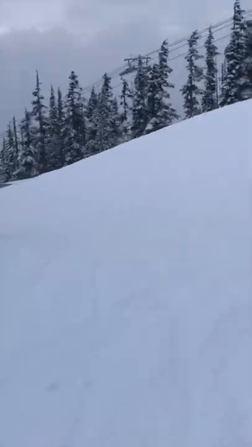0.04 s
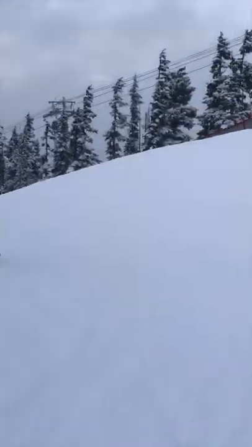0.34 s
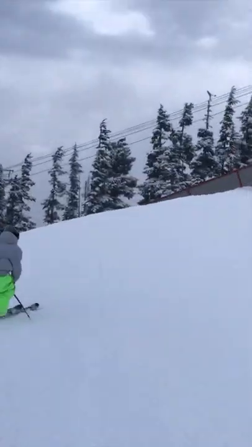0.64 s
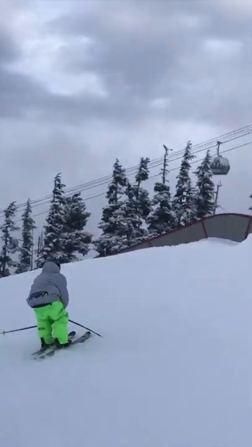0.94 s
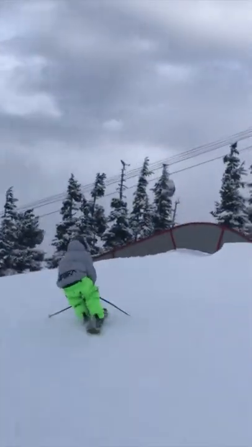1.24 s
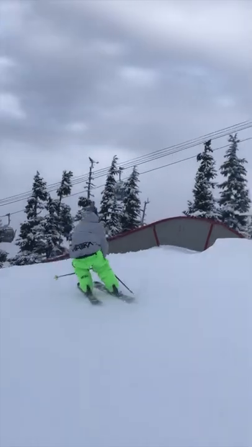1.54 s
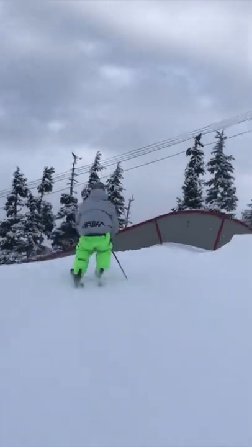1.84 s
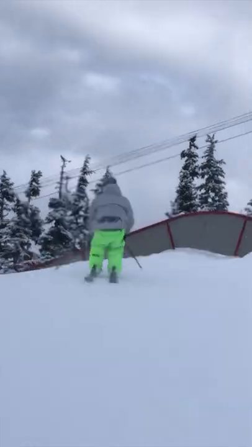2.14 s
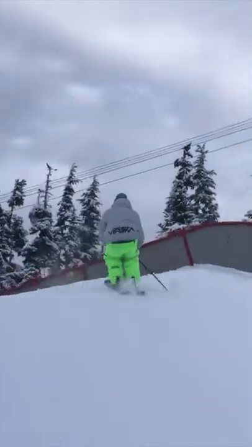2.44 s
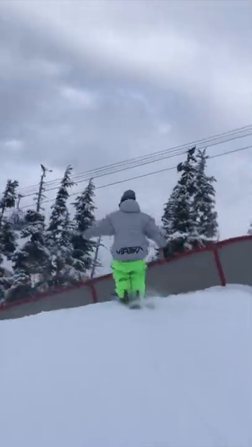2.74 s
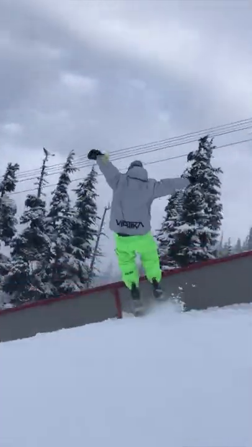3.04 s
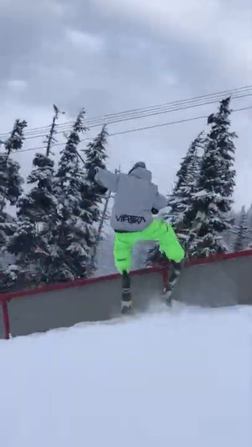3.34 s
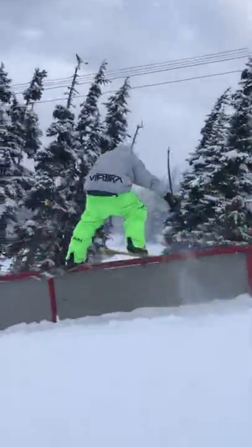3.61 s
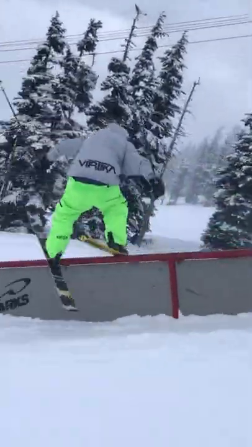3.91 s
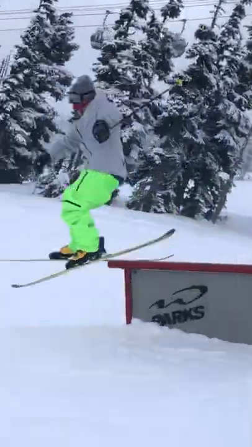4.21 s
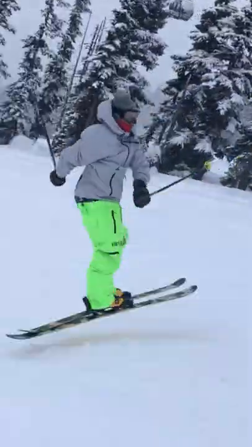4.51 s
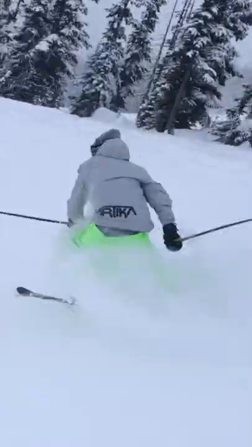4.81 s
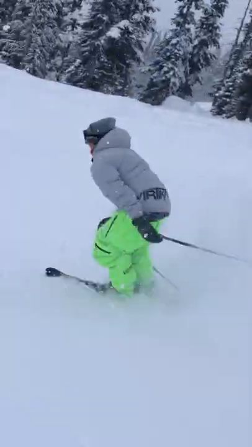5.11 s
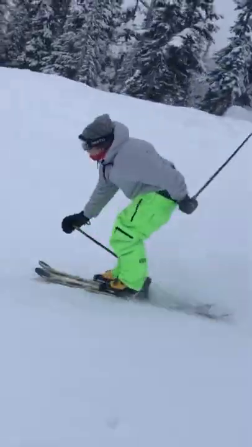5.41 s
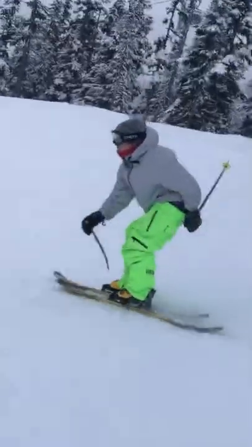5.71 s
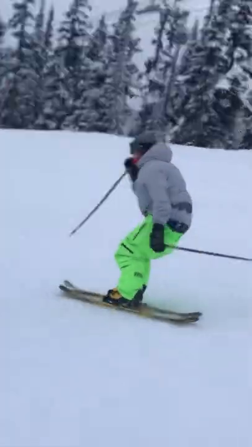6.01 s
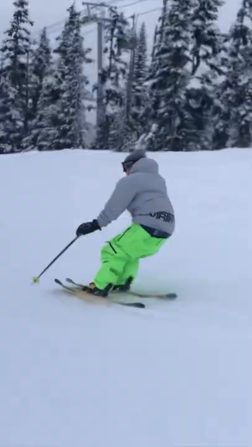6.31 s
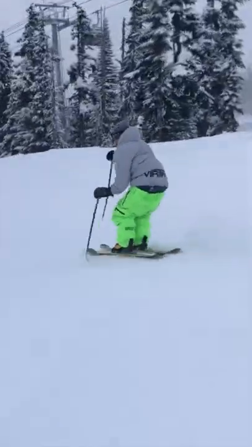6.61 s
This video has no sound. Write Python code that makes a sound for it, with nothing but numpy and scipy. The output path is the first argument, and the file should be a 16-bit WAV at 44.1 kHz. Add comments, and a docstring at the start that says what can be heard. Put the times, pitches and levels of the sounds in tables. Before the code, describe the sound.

A skier glides over packed snow, hits a steel-topped box with clacks and scrapes, lands and carves, ending in roaring wind.

```python
"""A skier glides over snow, followed by a camera; friction hisses, and lumps crumble and knock on the skis.
At 3.3 s the skis clack onto a steel-topped park box, and their edges scrape along it by stick and slip.
Near 4.6 s they slap down on the landing, ringing and flexing, then carve through a spray of snow.
From 5.9 s the camera gathers speed: a gust hits its microphone with a sharp tick, then roars."""
import sys
import numpy as np
from scipy.fft import rfft, irfft, next_fast_len
from scipy.io import wavfile
from scipy.ndimage import uniform_filter1d, minimum_filter1d, map_coordinates

SR = 44100
rng = np.random.default_rng(int(sys.argv[2]) if len(sys.argv) > 2 else 0)


def inscribe(sig):
    """Save sig as 16-bit PCM at rate SR to the path in sys.argv[1].

    A 1-D sig is mono; a 2-D sig holds one channel per row.
    Samples are clipped to [-1, 1] before scaling.
    """
    pcm = np.round(np.clip(np.atleast_2d(sig).T, -1, 1) * 32767)
    wavfile.write(sys.argv[1], SR, pcm.astype(np.int16))


N = 297675

# low rumble of flexing skis and of swirling air: f/Hz, spectral level/dB
RUMBLE_SPECTRUM = [(20, -24), (40, -4), (70, 3), (110, -1.5), (160, -1.5), (230, -9.5), (330, -17),
                   (550, -17), (1200, -46), (4000, -80)]
# hollow modes of a ski on snow: f/Hz, bandwidth/Hz, gain/dB
KNOCK_MODES = [(684, 250, -8.5), (1029, 98, 3), (1317, 140, -10), (2160, 210, -19.5)]
CRUNCH_DB = -52.5  # base level on plain packed snow


def clacks_and_wind_tick(noise_share=0.13, dispersion=0.029):
    """Impulse response: blows and rattling bindings ring the ski, treble travelling faster than bass.
    The last impulse is the sharp tick of wind hitting the microphone as the gust begins."""
    # ski clacks, then the wind tick at 5.96 s: t/s, peak level/dB, centre f/Hz, noise t60/s
    impulses = [(.168, -28, 9000, .012), (1.284, -18.5, 1400, .035), (1.465, -26.5, 2800, .033),
                (1.534, -27, 3400, .025), (1.593, -26, 4020, .025), (1.881, -27, 3200, .055),
                (2.142, -26.5, 2400, .035), (3.3071, -6, 2740, .024), (3.3103, -8.5, 2400, .018),
                (3.32, -10.5, 2500, .025), (3.455, -18.5, 2630, 0.0094), (3.592, -24, 3040, .04),
                (3.7964, -27.5, 1500, .049), (3.8384, -28.5, 3000, 0.059), (4.248, -28, 900, 0.12),
                (4.454, -22, 1800, .012), (4.556, -8.5, 4700, 0.0091), (4.559, -19.5, 1500, 0.054),
                (4.5856, -18, 1420, 0.019), (4.594, -11, 3600, 0.013), (4.596, -17, 1490, .025),
                (4.653, -20.5, 2800, 0.028), (5.962, -21, 2000, .025)]
    # modes of the steel-edged ski, also used to colour the tick: f/Hz, bandwidth/Hz, gain/dB
    modes = [(450, 400, -14.5), (1000, 380, -1), (1400, 390, -3), (1920, 330, 2.5), (2340, 160, 3.5),
             (2900, 850, -0.5), (3530, 390, -4), (4450, 1200, 2), (5430, 640, -3), (6600, 1000, -6),
             (8140, 3400, -6), (14300, 5000, -14)]
    out, t = np.zeros(N), np.arange(SR // 8) / SR
    colour = lambda f: modal_response(f, modes) * np.exp(-2j * np.pi * dispersion * np.sqrt(f))
    for s, db, hz, t60 in impulses:
        force = noise_share * rng.standard_normal(len(t)) * amp(-60 * t / t60)
        force[0] += 1  # the sharp onset
        add(out, s, filtered(force, lambda f: colour(f) * resonance(f, hz, 1.78 * hz) ** 2), db)
    return out


def scrapes(ring_db=-6, grit_db=1.6):
    """Stick-slip friction: an edge's tiny slips ring the steel box; its angle sets the brightness."""
    # edge drags: start t/s, hardest t/s, end t/s, level/dB, centre f/Hz
    drags = [(3.395, 3.432, 3.46, -31.5, 3300), (3.42, 3.476, 3.495, -30.5, 2900),
             (3.862, 3.905, 3.96, -37.5, 2930), (3.9, 3.995, 4.04, -31.7, 3100),
             (3.96, 4.004, 4.113, -33.5, 4800), (4.085, 4.125, 4.145, -40, 2600),
             (4.388, 4.44, 4.462, -42.5, 4270), (4.405, 4.452, 4.462, -37.5, 1680)]
    # box under a dragging edge: f/Hz, spectral level/dB
    spectrum = [(600, -30), (1300, 4), (1750, -2.5), (2300, 2), (3200, -3.5), (4200, -1), (5500, -0.5),
                (7000, -6), (9000, -3), (15000, -12)]
    # modes of the steel top: f/Hz, bandwidth/Hz, gain/dB
    box_modes = [(2240, 100, 1.5), (2990, 180, -2.5), (3344, 49, -1), (3600, 75, -4), (4000, 56, -3)]
    out = np.zeros(N)
    for start, hardest, end, db, hz in drags:
        slips = coloured(grains(rate=3000, spread_db=2, smooth=0.71), spectrum)
        steel = ringing(grains(rate=760, spread_db=5.5, smooth=0.34), box_modes)
        rasp = unit(filtered(slips + amp(ring_db) * steel, lambda f: resonance(f, hz, 0.9 * hz) ** 2))
        pressure = np.sin(np.pi / 2 * stroke(start, hardest, end))
        out += amp(db) * pressure ** 1.17 * rasp
    return out * amp(grit_db * wobble(200))


def thumps(lowest_hz=82, sag_s=0.024, attack_s=0.0013):
    """Dispersion: slow bending waves arrive last, so the pitch sinks to the ski's low mode; snow thuds."""
    # skis flexing under load: t/s, peak level/dB, starting f/Hz, t60/s
    flexes = [(.177, -27.5, 200, .09), (.196, -25.5, 417, 0.069), (.239, -33, 170, 0.054),
              (.993, -28.5, 363, 0.055), (1.304, -37, 232, .3), (1.766, -35, 118, .066),
              (2.222, -36, 232, .057), (2.538, -30.5, 324, 0.033), (3.308, -32, 480, .12),
              (3.323, -27.5, 270, 0.17), (3.348, -26, 140, .35), (3.456, -25.5, 140, .1),
              (3.471, -25.5, 276, .034), (4.587, -21.5, 443, 0.082), (4.605, -26.5, 229, 0.15),
              (4.657, -18.5, 212, 0.057), (4.763, -26, 230, 0.09)]
    out, t = np.zeros(N), np.arange(SR // 3) / SR
    for s, db, hz, t60 in flexes:
        pitch = lowest_hz + (hz - lowest_hz) * np.exp(-t / sag_s)
        swing = np.sin(2 * np.pi * np.cumsum(pitch) / SR)
        thud = unit(filtered(rng.standard_normal(len(t)), lambda f: resonance(f, 0.97 * hz, 2 * hz) ** 2))
        envelope = (1 - np.exp(-t / attack_s)) * amp(-60 * t / t60)
        add(out, s, (swing + 0.6 * thud) * envelope, db)
    return out


def spray():
    """Shear: skidding edges shave off snow in clumps, the more the harder they press."""
    # skids after the landing: start t/s, hardest t/s, end t/s, level/dB
    skids = [(4.68, 4.79, 5.25, -34.7), (5.13, 5.85, 5.99, -31.6), (5.986, 6.01, 6.11, -32.5)]
    # thrown snow: f/Hz, spectral level/dB
    spectrum = [(200, -31), (400, 0), (700, 4), (1500, 2), (2500, 2.5), (3200, 0.5), (4800, -0.5),
                (6500, -5), (9000, -14), (15000, -23)]
    thrown = sum(amp(db) * stroke(start, hardest, end) ** 1.09 for start, hardest, end, db in skids)
    clumps = amp(1.9 * wobble(70))
    return thrown * clumps * coloured(grains(rate=4000, spread_db=3.5, smooth=0.75), spectrum)


def lumps(crumble_t60=0.045, lesser_per_s=3, over_crunch_db=10.5):
    """Brittle fracture: crumbling lumps ring the ski; lesser ones come by chance, louder in crust."""
    # biggest lumps of hard snow: t/s, peak level/dB
    biggest = [(.203, -32), (0.667, -31.5), (.872, -30), (.994, -30.5), (1.12, -27.5), (1.287, -24.5),
               (1.3, -22.5), (1.466, -31), (1.884, -27), (2.155, -26.5), (2.341, -30), (2.46, -26),
               (2.541, -25.5), (2.932, -29), (3.124, -30), (3.638, -26), (5.373, -22), (5.49, -21.5),
               (5.761, -21)]
    out, t = np.zeros(N), np.arange(SR // 8) / SR
    crunch_db = 20 * np.log10(np.hypot(amp(CRUNCH_DB), crust_gain()))
    places = rng.integers(N, size=round(lesser_per_s * N / SR))
    lesser = [(i / SR, crunch_db[i] + over_crunch_db) for i in places]
    for s, db in biggest + lesser:
        crumble = rng.standard_normal(len(t)) * amp(-60 * t / crumble_t60)
        add(out, s, ringing(crumble, KNOCK_MODES), db)
    return out


def rumble():
    """Forced vibration: the uneven track flexes the skis."""
    # unevenness of the track: t/s, relative level/dB
    ground = [(0, -54.5), (.22, -43.5), (.45, -49.5), (.82, -44.5), (.98, -57), (1.3, -43), (1.75, -46),
              (1.85, -51.5), (2.2, -51.5), (2.45, -52), (3.25, -52), (3.55, -46.5), (4.45, -52),
              (4.75, -44.5), (5.3, -42.5), (5.92, -37)]
    return amp(curve(ground) - 1 + 4.1 * wobble(25)) * coloured(rng.standard_normal(N), RUMBLE_SPECTRUM)


def crunch(bumps):
    """Acoustic emission: packed snow breaks in tiny fractures, louder on bumps and in crust."""
    # breaking snow: f/Hz, spectral level/dB
    spectrum = [(100, -45), (330, -10.5), (600, 1), (900, 4), (1400, -5), (2100, -7.5), (3200, -18),
                (8000, -42)]
    gain = np.hypot(amp(CRUNCH_DB), amp(0.5) * crust_gain()) * amp(2.2 * bumps - lift_db())
    return gain * coloured(grains(rate=2500, spread_db=5.5, smooth=0.61), spectrum)


def chatter(bumps, base_db=-52.5):
    """Random excitation: small jolts from the snow keep the ski's hollow modes ringing."""
    ring = ringing(grains(rate=500, spread_db=2.5, smooth=0.72), KNOCK_MODES)
    gain = np.hypot(amp(base_db), amp(-1) * crust_gain())
    return gain * amp(2 * bumps + 2.04 * wobble(11) - lift_db()) * ring


def hiss(bumps):
    """Sliding friction: the ski bases rub broadband noise from the snow, modulated by bumps."""
    # how hard the bases slide: t/s, relative level/dB
    glide = [(0, -47.5), (.35, -46.5), (.8, -47.5), (1.68, -46.5), (2.08, -50.5), (2.4, -47.5), (3.25, -47),
             (3.4, -42.5), (4.03, -47), (4.2, -49), (4.48, -49.5), (4.65, -42.5), (6.75, -45)]
    # friction noise: f/Hz, spectral level/dB
    spectrum = [(400, -19), (1500, -1), (2900, -1), (4500, 0.5), (6000, -1.5), (8500, -7.5), (15000, -15.5)]
    gain = amp(curve(glide) - 0.66 + 1.76 * bumps - lift_db())
    return gain * coloured(grains(rate=3000, spread_db=3.5, smooth=1.1), spectrum)


def packing():
    """Compaction: soft snow collapses under the skis with a dull, grainy crump."""
    # snow packing down: t/s, level/dB
    levels = [(0, -57), (.4, -52), (.8, -44), (.94, -54.5), (1.03, -44), (1.5, -51.5), (3.2, -51),
              (4.45, -56), (4.78, -42), (5.05, -54.5), (5.9, -49)]
    # collapsing snow: f/Hz, spectral level/dB
    spectrum = [(90, -33), (200, 0), (320, 0.5), (450, -3.5), (700, -12), (1500, -42)]
    gain = amp(curve(levels) + 1.55 * wobble(35))
    return gain * coloured(grains(rate=700, spread_db=3, smooth=0.37), spectrum)


def powder(dropout_db=15, dropout_half_s=0.02):
    """Shot noise: loose crystals add up to a fluttering sizzle that fades when the skis run light."""
    # powder streaming past: t/s, relative level/dB
    stream = [(0, -51), (.35, -59), (.65, -53.5), (1.25, -54.5), (1.5, -58), (1.68, -50.5), (1.8, -55.5),
              (2.6, -57), (3.4, -56), (3.72, -51), (4.35, -61), (4.85, -51.5), (5.3, -52), (6.02, -44),
              (6.1, -55.5), (6.75, -54)]
    # brief dips in the sizzle: middle t/s
    dropouts = [.765, 0.84, 0.9]
    # sizzling crystals: f/Hz, spectral level/dB
    spectrum = [(1500, -17), (5000, -14), (8000, -0.5), (11000, 0.5), (13000, 3), (15500, 4.5)]
    dips_db = 1.2 * lift_db() + dropout_db * sum(bell(s, dropout_half_s) for s in dropouts)
    gain = amp(curve(stream) - dips_db + 4.5 + 2.3 * wobble(36))
    return gain * coloured(grains(rate=2300, spread_db=7, smooth=1.5), spectrum)


def wind(swirl_db=-28, buffet_over_db=19.5, saturation_db=-18, port_hz=48):
    """Turbulence: eddies buffet the microphone and saturate; faster air rushes and crackles at its port."""
    # strength of the air stream: t/s, level/dB
    stream = [(5.925, -64), (5.97, -44), (6.112, -36.5), (6.125, -32), (6.29, -24), (6.335, -14),
              (6.6, -16.5), (6.67, -28), (6.75, -20.5)]
    # buffeting eddies: f/Hz, spectral level/dB
    buffet_spectrum = [(20, -28), (40, -18), (75, 1), (110, -2), (160, -0.5), (280, 1), (400, 0.5),
                       (570, 1), (800, -5), (1300, -14.5), (3000, -61), (8000, -80)]
    # rushing air: f/Hz, spectral level/dB
    rush_spectrum = [(150, -20), (350, -3.5), (520, 8.5), (700, 2.5), (1000, -2), (1400, -5.5),
                     (2000, -12.5), (3000, -23.5), (5000, -42), (12000, -58)]
    air_db, eddies = curve(stream), wobble(70)
    push = 1 / np.hypot(amp(-air_db - buffet_over_db), amp(-saturation_db))
    swirl = fade_in(5.92, rise=0.05) * amp(swirl_db) * coloured(rng.standard_normal(N), RUMBLE_SPECTRUM)
    buffet = push * amp(1.7 * eddies) * coloured(rng.standard_normal(N), buffet_spectrum)
    torn_noise = rng.standard_normal(N) * amp(3.6 * wobble(400))
    rush = amp(air_db + 0.89 * eddies) * coloured(torn_noise, rush_spectrum)
    pops = grains(rate=99, spread_db=5, smooth=0.09)
    crackle = push * amp(-30) * unit(filtered(pops, lambda f: resonance(f, 2150, 1100) ** 2))
    air = fade_in(5.88, rise=0.11) * (swirl + buffet + rush + crackle)
    return filtered(air, lambda f: f ** 4 / (f ** 4 + port_hz ** 4))  # high-pass


def crust_gain():
    """Incoherent addition: overlapping cuts through crust sum in power."""
    # cuts: three t/s (earliest starts, middle is hardest, latest ends), relative level/dB
    cuts = [(1.0, 1.07, 1.5, -52), (1.635, 1.73, 1.7, -43), (1.892, 2.018, 2.28, -47),
            (2.45, 2.932, 3.42, -46.7), (3.65, 3.76, 4, -47.5), (4.67, 4.78, 5.33, -38),
            (5.18, 5.516, 5.66, -36), (5.604, 5.78, 5.9, -35.5)]
    return np.sqrt(sum((amp(db) * stroke(*times)) ** 2 for *times, db in cuts))


def lift_db():
    """Unloading: snow noise drops while the skis run light."""
    # light moments: middle t/s, half length/s, drop/dB
    lifts = [(0.15, 0.062, 5.5), (1.83, 0.053, 3), (2.105, .033, 5), (4.204, 0.042, 2.5)]
    return sum(db * bell(s, half) for s, half, db in lifts)


def amp(db):
    """Decibels to gain."""
    return 10 ** (np.asarray(db) / 20)


def unit(x):
    """x at rms 1."""
    return x / np.sqrt(np.mean(x ** 2) + 1e-20)


def curve(rows):
    """Linear interpolation of (t/s, value) rows at every sample."""
    return np.interp(np.arange(N) / SR, *np.transpose(rows))


def fade_in(start, rise):
    """Linear ramp 0-1 from start, over rise seconds."""
    return np.clip((np.arange(N) / SR - start) / rise, 0, 1)


def stroke(*times):
    """Triangular pressure 0-1-0 through three times, taken in ascending order."""
    return np.interp(np.arange(N) / SR, np.sort(times), [0, 1, 0])


def bell(middle, half):
    """Gaussian pulse of height 1."""
    return np.exp(-((np.arange(N) / SR - middle) / half) ** 2)


def wobble(rate):
    """Smooth random modulation, rate knots a second."""
    return map_coordinates(rng.standard_normal(int(N * rate / SR) + 4), [np.arange(N) * rate / SR])


def grains(rate, spread_db, smooth):
    """Shot noise: uneven impulses, rate a second, on a share of smooth noise."""
    sizes = rng.standard_normal(N) * amp(spread_db * np.clip(rng.standard_normal(N), -2, 2))
    impulses = unit(sizes * (rng.random(N) < rate / SR))
    return unit(impulses + smooth * rng.standard_normal(N))


def filtered(x, response):
    """Linear filtering: the spectrum of x times a complex response."""
    m = next_fast_len(len(x) + 8192)
    return irfft(rfft(x, m) * response(np.fft.rfftfreq(m, 1 / SR)), m)[:len(x)]


def coloured(x, spectrum):
    """x shaped by (f/Hz, level/dB) rows, at rms 1."""
    hz, db = np.transpose(spectrum)
    return unit(filtered(x, lambda f: amp(np.interp(np.log(f + 1), np.log(hz), db))))


def resonance(f, hz, width):
    """Response of one damped mode."""
    return 1j * f * width / (hz * hz - f * f + 1j * f * width)


def modal_response(f, modes):
    """Superposition of damped modes."""
    return sum(amp(db) * resonance(f, hz, width) for hz, width, db in modes)


def ringing(force, modes):
    """Forced vibration of a set of modes, at rms 1."""
    return unit(filtered(force, lambda f: modal_response(f, modes)))


def add(track, s, x, db):
    """Mix x into the track at time s with a peak of db."""
    part = track[round(s * SR):][:len(x)]
    part += (amp(db) * x / np.abs(x).max())[:len(part)]


def scene():
    """Superposition: skis, snow, box and wind sum at one microphone."""
    bumps = wobble(45)
    snow = rumble() + crunch(bumps) + chatter(bumps) + hiss(bumps) + packing() + powder() + spray()
    return (snow + clacks_and_wind_tick() + thumps() + scrapes() + wind() + lumps())[None]


def record(dry, ceiling=0.46, top_hz=15850):
    """Peak and band limiting: a fast limiter holds the gusts down, then the highest treble is cut."""
    x = dry[0]
    needed = np.minimum(1, ceiling / (np.abs(x) + 1e-9))
    gain = uniform_filter1d(minimum_filter1d(needed, size=61), size=61)
    return filtered(x * gain, lambda f: f < top_hz)[None]


dry = scene()
out = record(dry)
inscribe(out)
```